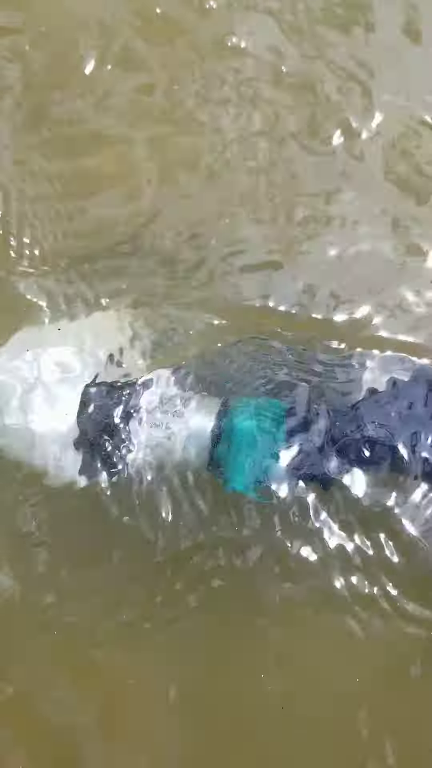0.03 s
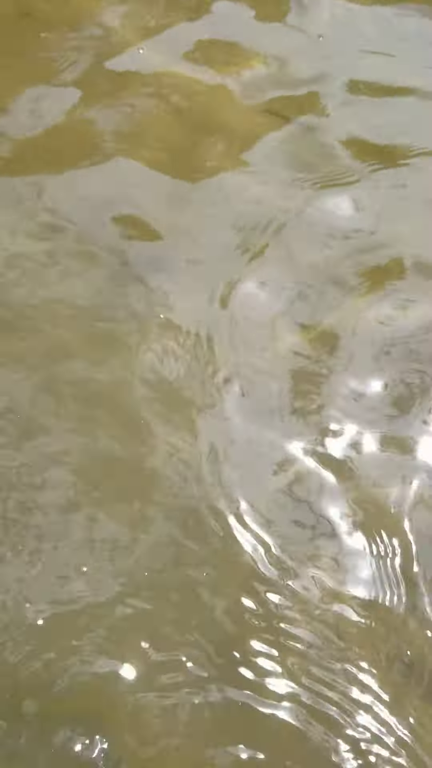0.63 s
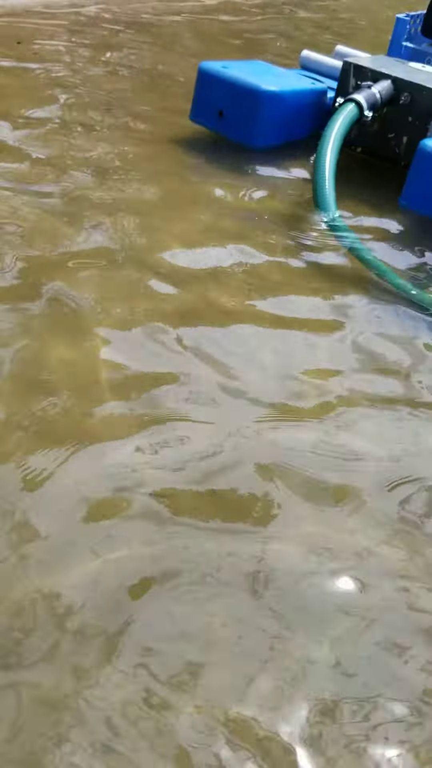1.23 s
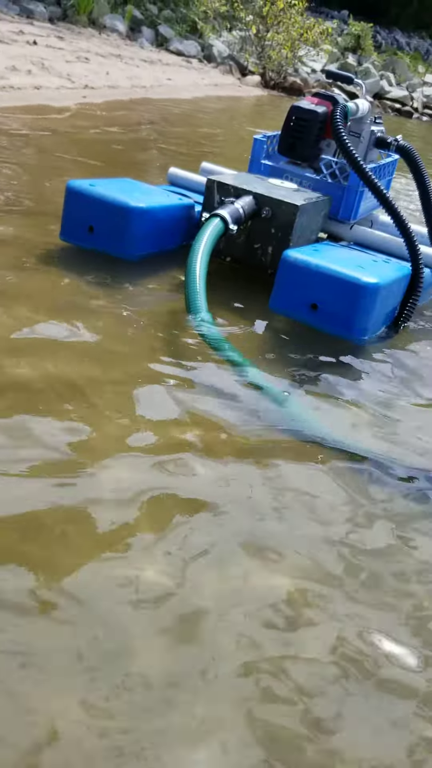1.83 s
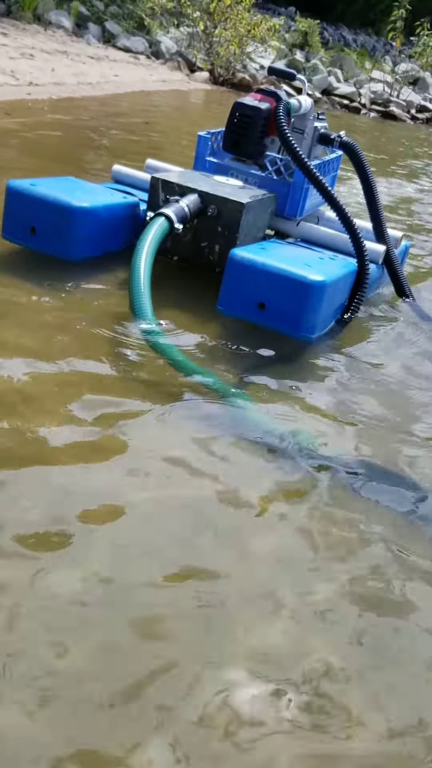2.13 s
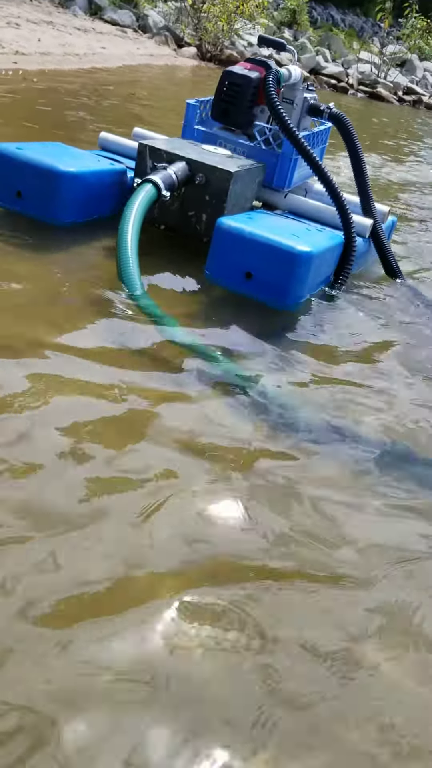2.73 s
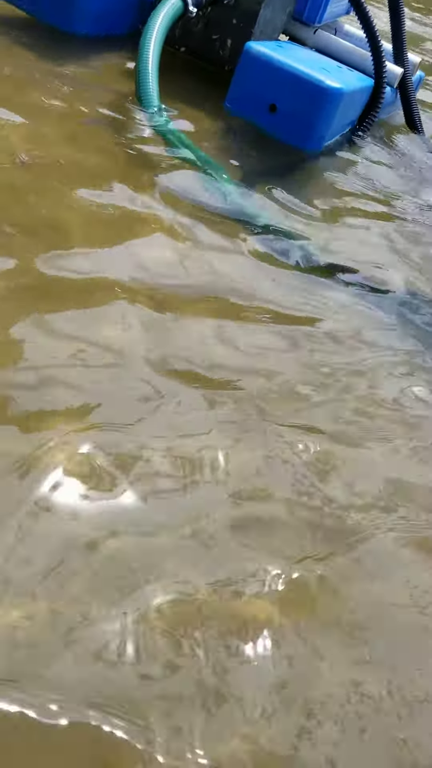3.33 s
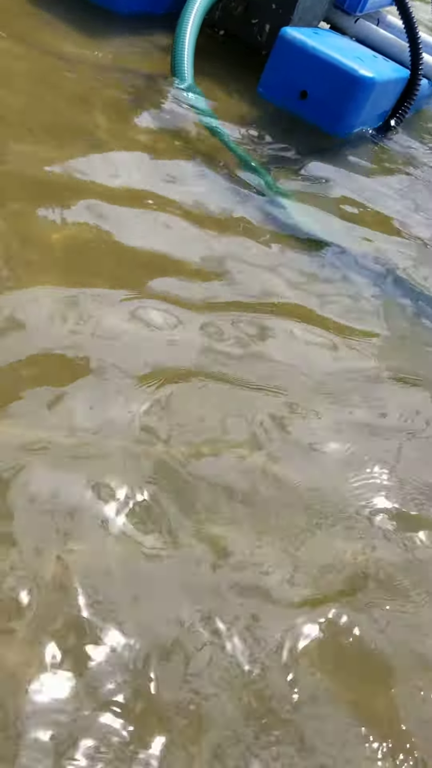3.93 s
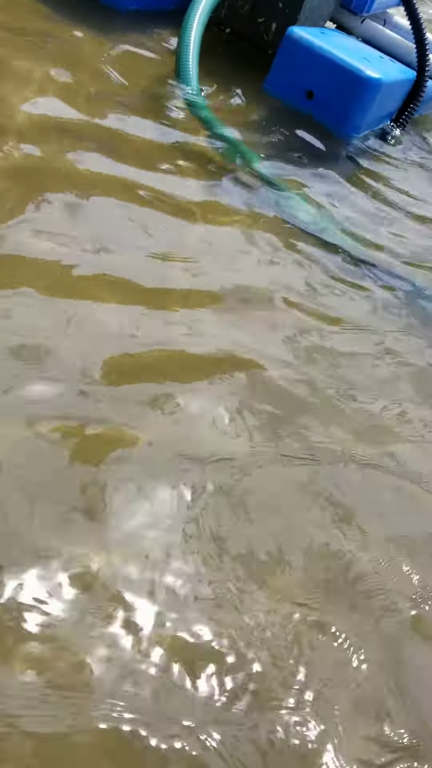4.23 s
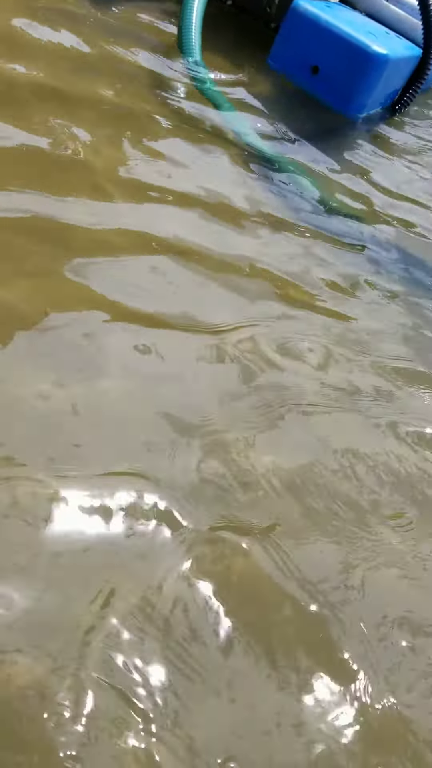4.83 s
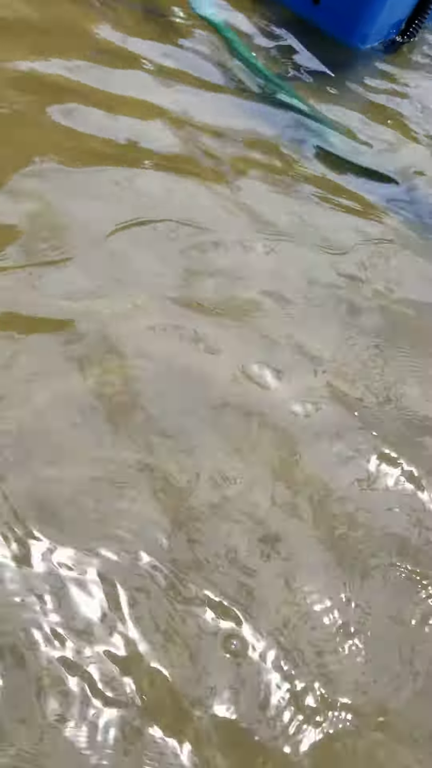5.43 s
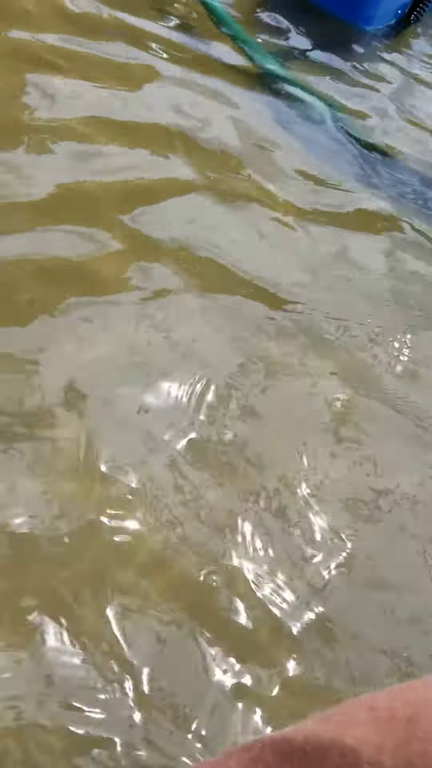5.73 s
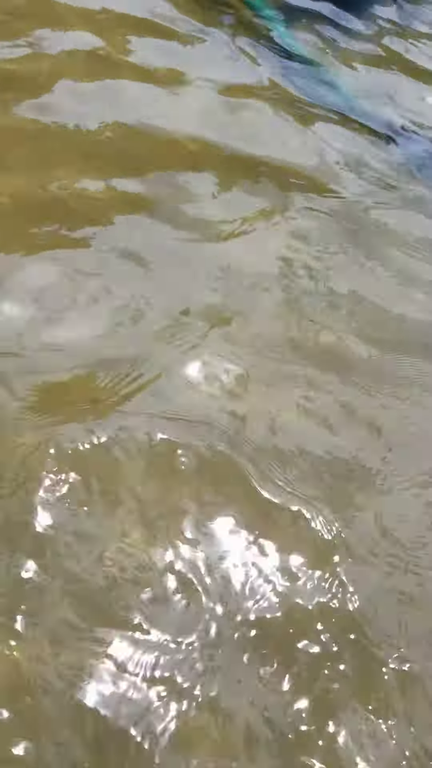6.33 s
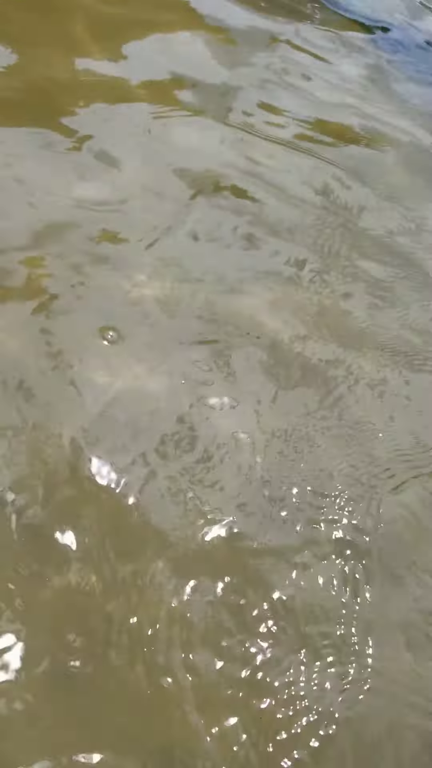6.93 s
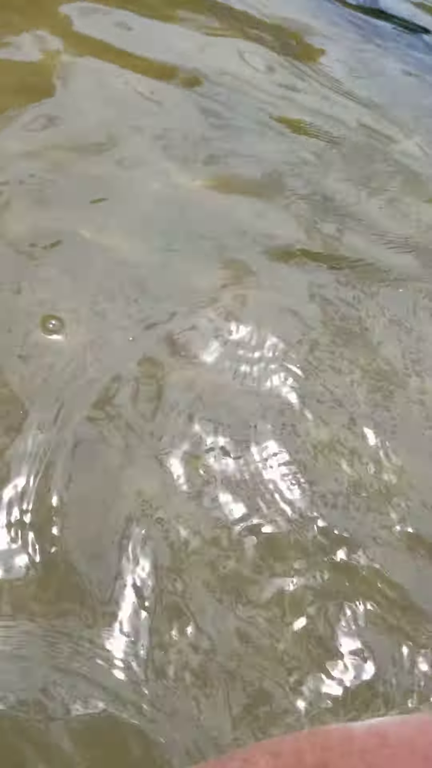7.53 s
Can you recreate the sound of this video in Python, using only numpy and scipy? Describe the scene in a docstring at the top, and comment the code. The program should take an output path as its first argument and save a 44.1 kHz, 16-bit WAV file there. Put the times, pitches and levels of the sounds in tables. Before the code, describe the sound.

Heard from a handheld phone a few steps away, a floating dredge's two-stroke engine drones loudly and without a break over shallow water. Its exhaust barks and hisses in a fast, slightly ragged buzz, the metal housing rings, and the pump adds an even rush. The speed barely wavers, though the tone changes as the phone moves. Past the middle a faint high whine rises, and late on a single drop ticks.

```python
"""On shallow water, a floating dredge rocks a few steps from a phone, its pump run by a two-stroke engine.
Each firing barks through the muffler and puffs out gas; the boom and the puff grow louder with speed.
The engine sputters, and about every third firing hits harder. Its metal casing buzzes, sings and whines,
the pump and the cooling fan rush underneath, and near the end one drop ticks on the water.
The phone turns, so the sound reaches its two microphones differently."""
import sys
import numpy as np
from scipy import signal
from scipy.fft import rfft, irfft, next_fast_len
from scipy.io import wavfile
from scipy.ndimage import uniform_filter1d, map_coordinates

SR = 44100
rng = np.random.default_rng(int(sys.argv[2]) if len(sys.argv) > 2 else 0)


def store_pcm(level_fs):
    """Save levels as 16-bit WAV."""
    pcm = np.round(np.clip(level_fs, -1, 1) * 32767).astype(np.int16)
    wavfile.write(sys.argv[1], SR, np.atleast_2d(pcm).T)


N = 338247

# engine speed: time_s, firings_hz
ENGINE_SPEED = [(0.0, 116.42), (0.06, 116.93), (0.24, 114.9), (0.3, 115.22), (0.42, 114.24), (0.48, 114.7),
                (0.59, 113.97), (0.71, 114.34), (0.83, 115.65), (1.07, 114.95), (1.19, 115.97),
                (1.31, 114.12), (1.55, 112.65), (1.72, 115.42), (1.84, 116.55), (2.02, 115.47),
                (2.08, 114.32), (2.26, 113.89), (2.44, 115.52), (2.5, 114.73), (2.56, 116.22),
                (2.74, 116.19), (2.85, 114.13), (2.91, 114.18), (3.15, 116.35), (3.27, 114.74),
                (3.45, 114.78), (3.63, 116.8), (3.75, 116.12), (3.81, 117.06), (3.86, 115.96),
                (4.22, 117.48), (4.46, 116.69), (4.64, 118.31), (4.82, 117.45), (4.99, 118.03),
                (5.05, 117.1), (5.29, 115.53), (5.41, 115.46), (5.47, 116.41), (5.65, 117.49),
                (5.77, 117.39), (5.89, 116.47), (6.06, 117.72), (6.3, 117.74), (6.9, 117.38),
                (7.02, 115.81), (7.25, 116.29), (7.61, 114.61), (7.67, 115.95)]
# how late the right microphone hears as the phone turns, before each layer's share: time_s, delay_ms
RIGHT_DELAY = [(0, .41), (.5, .41), (1, .24), (1.6, .13), (2.1, .14), (2.9, .19), (3.3, .28), (4.2, .26),
               (6.7, .37), (7.67, .36)]
# tone colours, or how strong each pitch is next to the others: pitch_hz, left_db, right_db
MUFFLER_COLOUR = [(60, -55, -57), (118, -35, -40), (227, -37, -37), (332, -37, -39.5), (464, -26.5, -26.5),
                  (600, -29.5, -30), (740, -44.5, -34), (780, -36, -32.5), (960, -48, -38.5),
                  (1044, -35.5, -29.5), (1180, -29, -21), (1290, -28.5, -24), (1330, -34.5, -26),
                  (1508, -35, -31.5), (1660, -41, -32), (1735, -31.5, -23.5), (1800, -34.5, -27.5),
                  (1990, -30.5, -24), (2092, -27.5, -24), (2180, -36.5, -32.5), (2330, -36, -31.5),
                  (2460, -35, -33.5), (2590, -49, -47), (2710, -35, -36), (2800, -36, -35.5),
                  (2870, -39, -37.5), (3016, -33, -39.5), (3070, -52, -50), (3360, -58, -68),
                  (6000, -59, -68), (15800, -76, -76)]
PUFF_COLOUR = [(101, -33, -30), (588, 8, 6.5), (880, -18, -16), (1320, -6, -3), (2020, -9, 3),
               (2380, 0, -1), (2870, 2, 8), (3040, -2, 3), (3930, -6, -9.5), (4380, -7, -1),
               (5400, -0.5, -4.5), (5600, -7, -10), (6330, -5, -5), (7800, -7.5, -19), (12000, -25, -38)]
HISS_COLOUR = [(2490, -55, -31), (4960, -18, -20), (6640, -17, -40), (6800, 7, 8), (8000, -2.5, -5),
               (8400, -0.5, 9), (10600, 8, 3), (11200, -7, 9), (13100, 13.5, 7), (14800, -15, 8),
               (16000, -4, 7)]
CASING_COLOUR = [(2000, -25, -25), (3100, -7, -9), (3300, -2, -4), (3620, 0, -6), (4050, -5, -10),
                 (4300, -1, -3), (4600, 2, 2), (5000, 0, -2), (5280, -3, 1), (5600, -8, -6), (6050, -3, -2),
                 (6900, -7, -6), (7800, -12, -18), (9000, -14, -11), (12500, -10, -9), (16000, -16, -12)]
PUMP_COLOUR = [(20, -7, -15), (45, -6, -12), (81.5, -16, 5.5), (160, -3, 6.5), (507, 5, -1.5),
               (780, -11, 1), (1520, 6.5, 5.5), (2270, 9.5, -8), (3450, 4, 4), (4100, 2.5, -12),
               (4600, -4, -7), (6100, -6, 0), (8100, -14.5, -18), (16200, -17.5, -23)]
# tone colour of the low putter: pitch_hz, gain_db
PUTTER_COLOUR = [(40, -21), (80, -1), (150, -3), (290, 6), (420, 2), (520, 8), (640, -7.5), (780, -8),
                 (1300, -14), (2100, -37), (3500, -53), (8000, -103)]
# how alike rushing noise is on the two sides: pitch_hz, likeness (1 = the same)
STEREO_LIKENESS = [(30, 0.26), (120, 0.73), (700, 1), (2000, 0.39), (4000, 0.11), (8000, 0.45),
                   (15000, 0.21)]
# lift or cut of four exhaust ranges, low to high: time_s, left_db, right_db
THROAT_GAIN = [(0.0, 1.5, 0.5), (0.83, -3.1, -0.5), (1.61, -6, -0.5), (2.44, -6, -0.4), (3.27, -2, -1),
               (4.22, 1.5, -0.5), (4.7, -1, -0.5), (6.9, 4, 0.5), (7.67, 1.5, -3)]
HONK_GAIN = [(0.0, -6, -3.5), (0.25, -3, -1.5), (0.48, -10, 2), (0.7, -2, 1.5), (0.95, -0.5, -3),
             (1.45, -8, -5), (1.84, -0.5, -6), (2.1, -6, -7.5), (2.45, -3, 1), (2.8, -7, -3),
             (3.27, -4.5, -1), (4.22, -10, -1.2), (4.7, -6, 1.5), (4.97, -1, 2), (5.3, -8, 0),
             (5.83, -3, -1), (6.2, -8, 1), (6.84, -7, 2), (6.96, -10, -0.5), (7.67, -8, -1.5)]
RASP_GAIN = [(0.0, -14, -2), (0.48, -7.5, -1), (1.13, 0, 1.8), (1.3, -4.5, 0), (1.53, 2, 4), (1.66, 3.5, 4),
             (1.96, 2, -9), (2.32, 3, 1.5), (2.75, -0.5, 0.5), (2.91, 3, 3), (3.45, 0.5, 4), (3.92, 1, 1.7),
             (4.1, -6, 0), (4.88, 0, 2.5), (5.05, -3.5, 0.5), (5.29, -6, 0.5), (5.89, -12, -1.5),
             (6.48, -6, 2), (7.67, -8, -2.5)]
TIN_GAIN = [(0.0, -12, -16), (0.18, -8, 6), (0.36, -1, 11), (0.58, 0, 1), (0.72, 1, 7), (0.95, -2.5, 3),
            (1.37, -2, -8), (1.84, -1, 1.5), (2.08, 3, 6), (2.32, 0, -3), (2.62, 4, 2), (2.85, -11, -8),
            (3.15, -4, -9), (3.5, 2, -1), (4.16, 4, 6), (4.6, 4, 5), (5.11, 1, -3), (5.47, 5, 3),
            (5.77, 4.5, 5), (6.54, 4, -8), (7.67, 0, 1)]
# lift or cut of the casing's buzz: time_s, left_db, right_db
RATTLE_GAIN = [(0, 3, 6), (.55, 11, 3), (1.1, -1, 6), (1.5, -7, -5), (1.9, 8, -1), (2.3, 8, -14),
               (3.2, 2, -29), (4, 9.5, -15), (4.8, 5, -2.5), (5.25, 1, -3), (5.7, 1, 9), (6.7, 7, 6),
               (7.1, 4, 4), (7.67, 6.5, 8)]
# how boom and puff follow the speed: gain_at_cruise_db, rise_db_per_hz
BOOM_BY_SPEED = (0, 0.14)
PUFF_BY_SPEED = (-30.2, 0.5)
# loudness of the gas hiss and the casing's whine: time_s, left_db, right_db
HISS_LEVEL = [(0, -31, -33), (.45, -36, -34), (.58, -33, -31), (1.1, -34, -31.5), (1.55, -32.5, -30),
              (1.85, -34, -29.5), (2.2, -30, -27.5), (2.6, -35, -29), (3.05, -33, -29), (3.8, -33, -30.5),
              (4.4, -29.5, -28), (5.3, -31, -31.5), (5.75, -28.5, -29.5), (6.7, -28.5, -30.5),
              (7.1, -31, -31.5), (7.67, -33, -35.5)]
WHINE_LEVEL = [(0, -50, -54), (4.2, -48, -48), (4.65, -34, -38), (4.85, -46, -46), (5, -39, -42),
               (5.3, -48, -50), (5.7, -38, -44), (5.9, -41, -48), (6.1, -33, -44), (6.85, -33, -44),
               (7.05, -41, -49), (7.67, -48, -54)]
# loudness of the deep hum: time_s, level_db
HUM_LEVEL = [(0, -21), (2, -19.5), (2.8, -20.5), (4, -19.5), (4.8, -21.5), (5.4, -19.5), (6.5, -20.5),
             (7.67, -19.5)]
# rise and fall of the putter, which also sets how rough the engine runs: time_s, gain_db
PUTTER_GAIN = [(0, -47), (.4, -44), (.6, -42), (.95, -42), (1.13, -52), (1.21, -33), (1.5, -31), (1.6, -45),
               (1.78, -53), (1.92, -35), (2.02, -32.5), (2.26, -32), (2.56, -48), (2.85, -31.5),
               (2.98, -42), (3.27, -32.5), (3.57, -48), (3.86, -39), (4.1, -45), (4.3, -41), (4.55, -49),
               (4.9, -45), (5.08, -36), (5.3, -34), (5.65, -52), (5.83, -35), (5.97, -47), (6.3, -45),
               (6.84, -52), (6.96, -34), (7.19, -40), (7.55, -37), (7.67, -43)]
# notes at which the metal parts ring: pitch_hz, width_hz, left_db, right_db
METAL_NOTES = [(2352, 24, -46, -30), (4400, 120, -44, -42.5), (4590, 70, -45, -43), (5270, 150, -51, -46),
               (6110, 60, -50, -47)]
# a moving dip in each microphone's treble: time_s, pitch_hz, depth_db
LEFT_DIP = [(0, 2970, 16), (.5, 2870, 4), (.8, 3430, 2), (1.2, 3100, 8), (1.9, 2560, 12), (2.6, 2900, 8),
            (3.3, 3350, 2), (4.5, 3980, 3), (5.2, 3840, 2.5), (6.6, 3900, -3), (6.9, 2400, 4),
            (7.1, 2350, 18), (7.67, 2250, 7)]
RIGHT_DIP = [(0, 2750, 14), (.6, 2630, 10), (1, 2310, 39), (1.4, 2030, 15), (1.7, 1750, 25), (2, 1540, 13),
             (2.4, 2020, 11), (2.8, 1950, 17), (3.3, 2360, 14), (4.2, 2570, 7.1), (5, 2600, 7.8),
             (5.7, 2790, 3.5), (6.4, 3150, 14), (7.67, 3100, 14)]

CRUISE_HZ, FIRST_FIRING_S = 116, .0052
PULSE_SIZE = SR / (np.sqrt(2) * CRUISE_HZ)  # gives each overtone of the firings a strength near 1


def amp(db):
    """Turn decibels into a number to multiply by."""
    return 10 ** (np.asarray(db) / 20)


def unit(x):
    """Scale x to an average strength (rms) of 1."""
    return x / np.sqrt(np.mean(x ** 2) + 1e-20)


def at_pitch(table, hz, column=1):
    """Read a table's column at any pitch, sliding between rows by octaves."""
    columns = np.transpose(table)
    return np.interp(np.log(hz + 1), np.log(columns[0] + 1), columns[column])


def curves(table):
    """Stretch each column after the time to one value per sample."""
    time_s, *columns = np.transpose(table)
    return np.array([np.interp(np.arange(N) / SR, time_s, column) for column in columns])


def wobble(rate_hz):
    """A smooth random curve through rate_hz points a second."""
    points = rng.standard_normal(int(N * rate_hz / SR) + 4)
    return map_coordinates(points, [np.arange(N) * rate_hz / SR])


def filtered(x, response):
    """Turn each pitch in x up or down by response(hz)."""
    size = next_fast_len(N + 8192)
    return irfft(rfft(x, size) * response(np.fft.rfftfreq(size, 1 / SR)), size)[..., :N]


def band(x, low_hz, high_hz):
    """Keep the part of x between two pitches."""
    below = lambda hz, edge: 1 / (1 + (hz / edge) ** 16)
    return filtered(x, lambda hz: below(hz, high_hz) - below(hz, low_hz))


def tinted(pair, colour):
    """Give each microphone its own tone colour."""
    return filtered(pair, lambda hz: amp([at_pitch(colour, hz, 1), at_pitch(colour, hz, 2)]))


def ring(x, colour, size=4096):
    """Let x strike a body that rings with the given colour."""
    log_gain = np.log(amp(at_pitch(colour, np.fft.rfftfreq(size, 1 / SR))))
    # fold the early half onto the late half, so the ringing comes after the strike
    folded = irfft(log_gain)
    folded[1:size // 2] *= 2
    folded[size // 2 + 1:] = 0
    return signal.fftconvolve(x, irfft(np.exp(rfft(folded))))[:N]


def pulses(positions, sizes):
    """Sharp clicks that may fall between two samples."""
    taps = np.floor(positions)[:, None] + np.arange(-7, 9)
    gap = taps - positions[:, None]
    clicks = np.sinc(gap) * np.cos(np.pi * gap / 16) ** 2 * sizes[:, None]
    return np.bincount(np.clip(taps, 0, N).astype(int).ravel(), clicks.ravel(), N + 1)[:N]


def at_phone(pair, share=1):
    """The right microphone hears the engine a little later than the left."""
    delay_ms = share * curves(RIGHT_DELAY)[0]
    right = map_coordinates(pair[1], [np.arange(N) - delay_ms * SR / 1000], order=3)
    return np.array([pair[0], right])


def rush(colour, swell=1):
    """Rushing noise that follows swell; the two sides are most alike in the low middle range."""
    angle = lambda hz: np.arccos(np.clip(at_pitch(STEREO_LIKENESS, hz), -1, 1)) / 2
    noise = rng.standard_normal((2, N)) * swell
    mid, side = filtered(noise, lambda hz: np.array([np.cos(angle(hz)), np.sin(angle(hz))]))
    return unit(at_phone(tinted(np.array([mid + side, mid - side]), colour)))


def burst(phase, rise_turns, fall_turns):
    """A quick swell to 1 and a fade within each turn of the crank."""
    shape = (1 - np.exp(-phase / rise_turns)) * np.exp(-phase / fall_turns)
    return shape / shape.max()


def speed_gain(rule):
    """A layer grows louder as the engine speeds up."""
    cruise_db, db_per_hz = rule
    return amp(cruise_db + db_per_hz * (curves(ENGINE_SPEED)[0] - CRUISE_HZ))


def crank():
    """One firing a turn: gives the turns so far, where each firing falls, and 1 for each hard one."""
    speed_hz = curves(ENGINE_SPEED)[0] * (1 + .0004 * wobble(22))
    turns = np.cumsum(speed_hz) / SR + 1 - FIRST_FIRING_S * CRUISE_HZ
    firings = np.interp(np.arange(int(turns[-1]) + 1), turns, np.arange(N))  # in samples
    # unburnt fuel builds up and goes off every third turn, now and then a turn early or late
    spacing = rng.choice([2, 3, 4], 1000, p=[.04, .92, .04])
    hard = np.isin(np.arange(len(firings)), np.cumsum(spacing)) * 1.0
    return turns, firings, hard


def roughness(firings, putter_db):
    """How rough the engine runs at each firing, 1 on average."""
    depth = amp(putter_db[firings.astype(int)] / 2)
    return depth / depth.mean()


def sputter(turns, hard, rough, gain_db=-12.5, db_per_doubling=5, hard_db=3):
    """Ragged burning: a short spit of noise on each firing, stronger while the engine runs rough."""
    spit_db = db_per_doubling * np.log2(rough) + hard_db * hard + rng.uniform(-3.6, 4, len(hard))
    shape = burst(turns % 1, rise_turns=.013, fall_turns=.2)
    spits = rng.standard_normal(N) * shape * amp(spit_db)[turns.astype(int)]
    return amp(gain_db) * np.sqrt(SR / 2 / CRUISE_HZ) * unit(spits)


def muffler(pressure):
    """Both microphones hear the same ring of the muffler, each shaded by the body of the phone."""
    shared = [(hz, (left + right) / 2) for hz, left, right in MUFFLER_COLOUR]
    shading = [(hz, (left - right) / 2, (right - left) / 2) for hz, left, right in MUFFLER_COLOUR]
    return tinted(ring(pressure, shared), shading)


def exhaust(firings, accent, rough, spits, jitter_s=8e-6, early_s=12e-6):
    """Each firing's push of gas rings the muffler: low boom and throat, nasal honk, rasp and tinny ring."""
    timing_luck, strength_luck = rng.standard_normal((len(firings), 2)).T
    # roughness scales both how much the timing scatters and how early the hard firings come
    positions = firings + SR * (jitter_s * rough * timing_luck - early_s * accent)
    strength_db = .53 * strength_luck + .8 * (accent - accent.mean())
    # a stronger firing has a steeper front, so the upper ranges vary more than the boom
    soft = muffler(-pulses(positions, PULSE_SIZE * amp(.75 * strength_db)))
    steep = muffler(spits - pulses(positions, PULSE_SIZE * amp(strength_db)))
    boom = speed_gain(BOOM_BY_SPEED) * band(soft, 170, 520)
    throat = amp(curves(THROAT_GAIN)) * band(soft, 520, 1100)
    honk = amp(curves(HONK_GAIN)) * band(steep, 1100, 1560)
    rasp = amp(curves(RASP_GAIN)) * band(steep, 1560, 2490)
    tin = amp(curves(TIN_GAIN)) * band(steep, 2490, 3400)
    low = at_phone(boom + throat, share=.65)
    return low + at_phone(honk + rasp, share=1.287) + at_phone(tin, share=1.295)


def gas(turns, accent, scatter_db=5, puff_limit_db=7, hiss_limit_db=10):
    """Each firing blows a puff from the outlet, then a sharp hiss; both are stronger on hard firings."""
    firing, phase = turns.astype(int), turns % 1
    size = amp(scatter_db * rng.standard_normal(len(accent)) + 3 * accent)[firing]
    puff_size = np.minimum(size, amp(puff_limit_db))
    puff = rush(PUFF_COLOUR, 1.6 + puff_size * burst(phase, rise_turns=.027, fall_turns=.7))
    hiss_scatter = amp(3.2 * rng.standard_normal(len(accent)))[firing]
    hiss_size = np.minimum(size * hiss_scatter, amp(hiss_limit_db))
    hiss = rush(HISS_COLOUR, 1.4 + hiss_size * np.sin(np.pi * phase ** .5) ** 4)
    return speed_gain(PUFF_BY_SPEED) * puff + amp(curves(HISS_LEVEL)) * hiss


def off_water(pair, patchy_db=2.5):
    """Echoes off the rippling water lift and hollow the sound in slowly changing patches."""
    spectrum = signal.stft(pair, nperseg=512)[2]
    patches = rng.standard_normal(spectrum.shape[1:]) + .96 * rng.standard_normal(spectrum.shape)
    for _ in range(2):
        patches = uniform_filter1d(patches, size=4, axis=1)  # smooth across pitch
        patches = uniform_filter1d(patches, size=70, axis=2)  # smooth across time
    return signal.istft(spectrum * amp(patchy_db * unit(patches)), nperseg=512)[1][:, :N]


def rattle(firings, accent, level_db=-40, ring_s=.003, colours=20):
    """Piston and pump shake the casing every turn: a metal buzz whose colour shifts as the dredge bobs."""
    knocks = pulses(firings, amp(rng.standard_normal(len(firings)) + accent))
    decay = np.exp(-np.arange(1024) / SR / ring_s)
    colour_now = np.linspace(0, colours - 1, N)
    buzz = np.zeros((2, N))
    for k in range(colours):  # each random ring fades into the next
        ringing = (rng.standard_normal(len(decay)) + 3.1 * rng.standard_normal((2, len(decay)))) * decay
        fade = np.sqrt(np.clip(1 - abs(colour_now - k), 0, 1))
        buzz += signal.oaconvolve((knocks * fade)[None], unit(ringing), axes=1)[:, :N]
    return amp(level_db + curves(RATTLE_GAIN)) * unit(at_phone(tinted(buzz, CASING_COLOUR)))


def singing_metal(firings, accent):
    """Firings nudge the metal parts, which sing when a multiple of the speed meets their note."""
    sizes = amp(2 * accent + 1.5 * rng.standard_normal(len(firings)))
    nudges = pulses(firings, PULSE_SIZE * sizes)
    response = lambda hz: sum(
        amp([[left], [right]]) * 1j * hz * width / (note ** 2 - hz ** 2 + 1j * hz * width)
        for note, width, left, right in METAL_NOTES)
    return at_phone(filtered(nudges, response), share=.84)


def pump(level_db=-27.5, waver_db=1.3):
    """Pump, fan and water make a steady rush that wavers a little."""
    return amp(level_db + waver_db * wobble(3.44)) * rush(PUMP_COLOUR)


def hum(turns, waver_db=.38):
    """The slow outflow of each firing makes a deep tone, a touch louder on the left."""
    gain = amp(curves(HUM_LEVEL)[0] + waver_db * wobble(6.9))
    tone = unit(np.cos(2 * np.pi * (turns + .3)))
    return gain * tone * amp([[.2], [-.2]])


def whine(turns, cycles_per_turn=28, waver_db=1):
    """A thin, wavering whine of the engine's metal casing, in step with the crank."""
    tone = np.sin(2 * np.pi * cycles_per_turn * turns + .5 * wobble(40))
    wavering = unit(tone * amp(waver_db * wobble(14)))
    return at_phone(amp(curves(WHINE_LEVEL)) * wavering)


def putter(firings, hard, putter_db, scatter_db=2, trim_db=-1):
    """The hard firings add low, lumpy thumps."""
    kicks = -pulses(firings, hard * amp(scatter_db * rng.standard_normal(len(firings))))
    thumps = unit(ring(kicks, PUTTER_COLOUR))
    return amp(putter_db + trim_db) * at_phone([thumps, thumps], share=.17) * amp([[.7], [-.7]])


def turning_dip(x, path, width_octaves=.13):
    """A narrow range of pitches fades at one microphone and moves as the phone turns."""
    hz, time_s, spectrum = signal.stft(x, SR, nperseg=1024)
    path_s, pitch_hz, depth_db = np.transpose(path)
    octaves_away = np.log2((hz[:, None] + 1) / np.interp(time_s, path_s, pitch_hz))
    cut_db = np.interp(time_s, path_s, depth_db) * np.exp(-(octaves_away / width_octaves) ** 2)
    return signal.istft(spectrum * amp(-cut_db), nperseg=1024)[1][:N]


def drop(start_s=6.44, level_db=-20, fall_s=.002):
    """A drop hits the water beside the phone with a short, bright tick."""
    age_s = np.arange(N) / SR - start_s
    splash = unit(band(rng.standard_normal((2, N)), 4500, 10500))
    return amp(level_db) * splash * (age_s > 0) * np.exp(-abs(age_s) / fall_s)


def scene():
    """One crank times all the engine's sounds; the pump's rush and the drop join them."""
    turns, firings, hard = crank()
    putter_db = curves(PUTTER_GAIN)[0]
    rough = roughness(firings, putter_db)
    accent = hard * rough  # hard firings stand out more while the engine runs rough
    spits = sputter(turns, hard, rough)
    outlet = exhaust(firings, accent, rough, spits) + off_water(gas(turns, accent))
    left, right = outlet + rattle(firings, accent) + singing_metal(firings, accent) + pump()
    machine = np.array([turning_dip(left, LEFT_DIP), turning_dip(right, RIGHT_DIP)])
    return machine + hum(turns) + whine(turns) + putter(firings, hard, putter_db) + drop()


def record(dry):
    """The phone rounds off the tallest peaks and loses the very highest treble."""
    rounded = dry / (1 + np.abs(dry / .98) ** 8) ** (1 / 8)
    return filtered(rounded, lambda hz: hz < 15850)


dry = scene()
out = record(dry)
store_pcm(out)
```